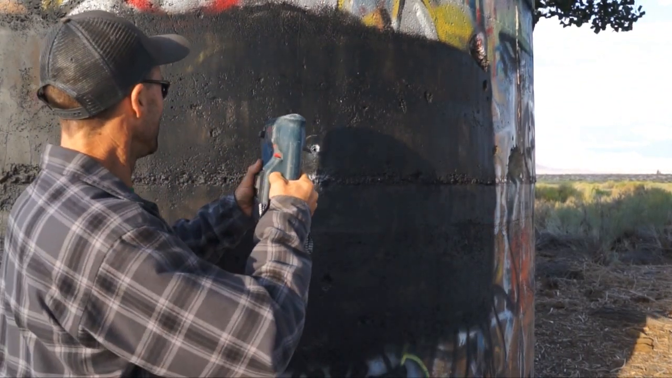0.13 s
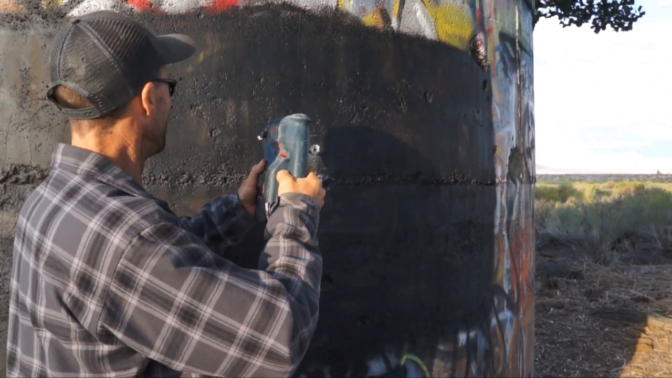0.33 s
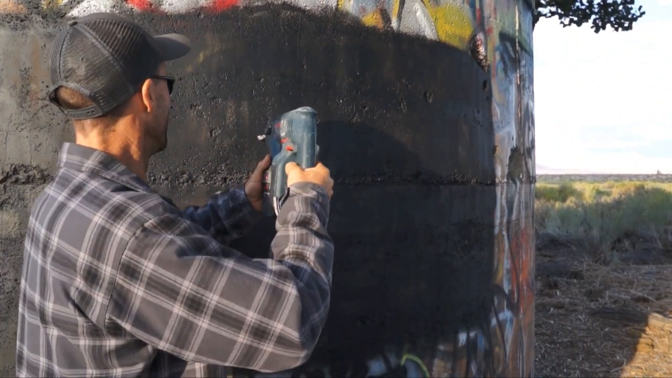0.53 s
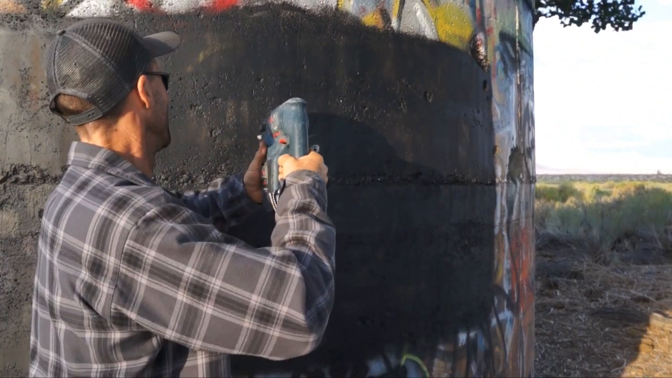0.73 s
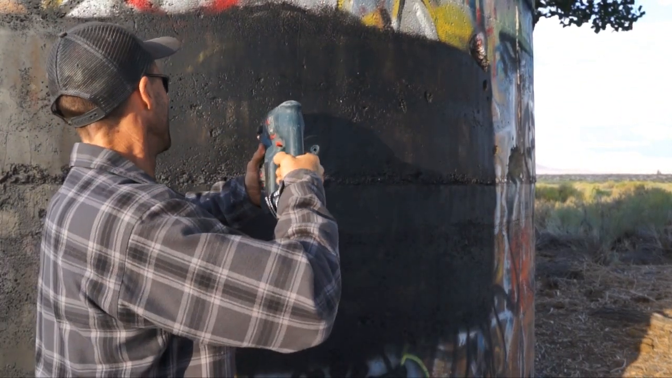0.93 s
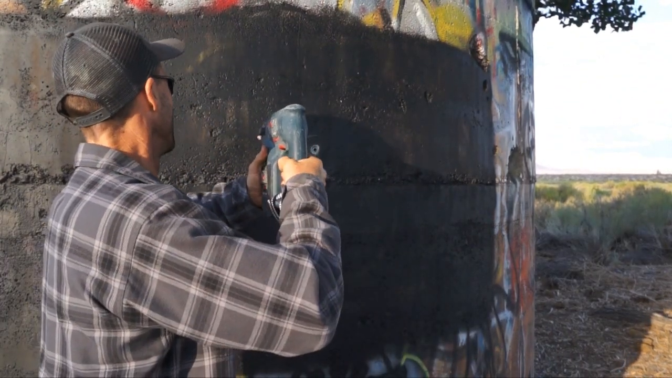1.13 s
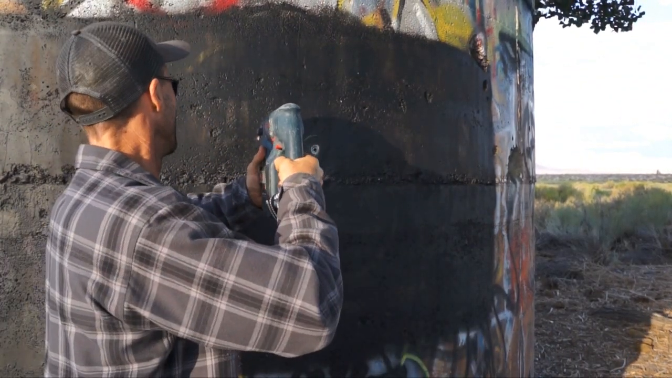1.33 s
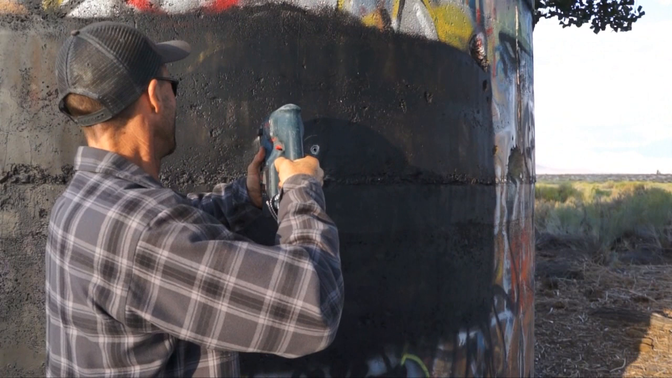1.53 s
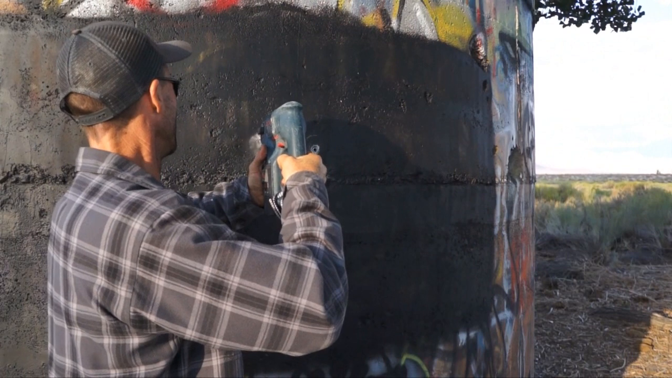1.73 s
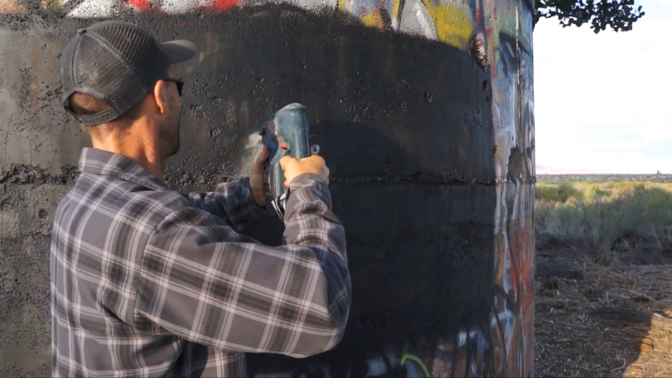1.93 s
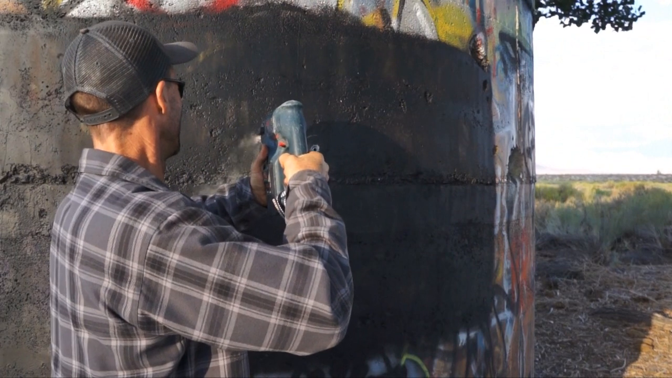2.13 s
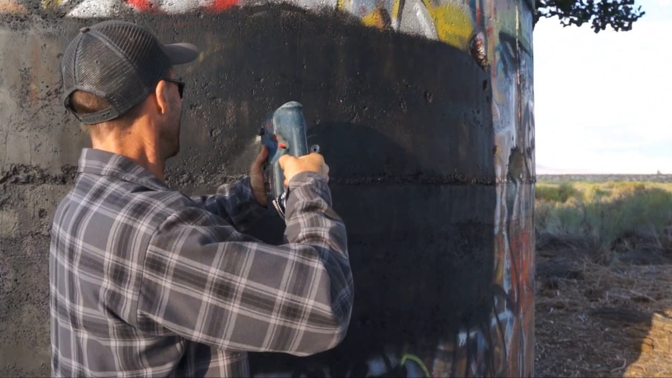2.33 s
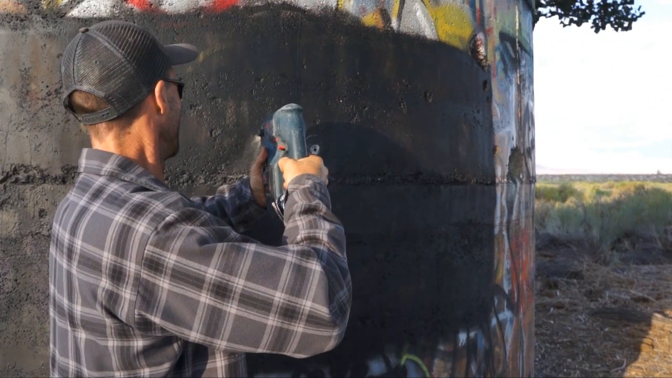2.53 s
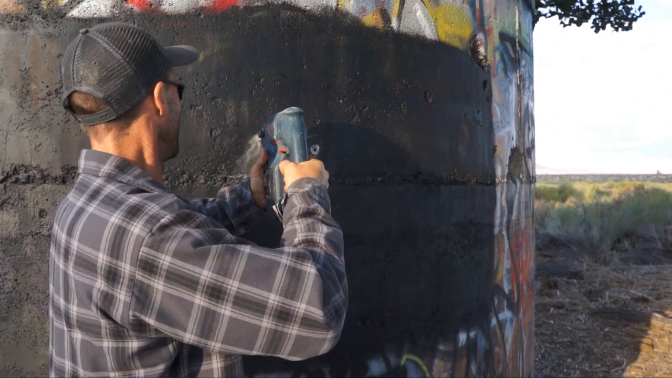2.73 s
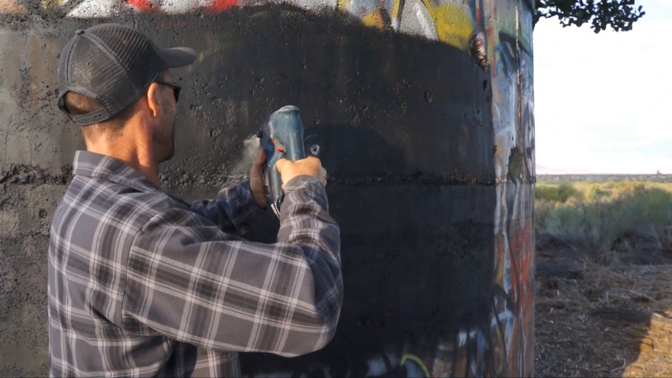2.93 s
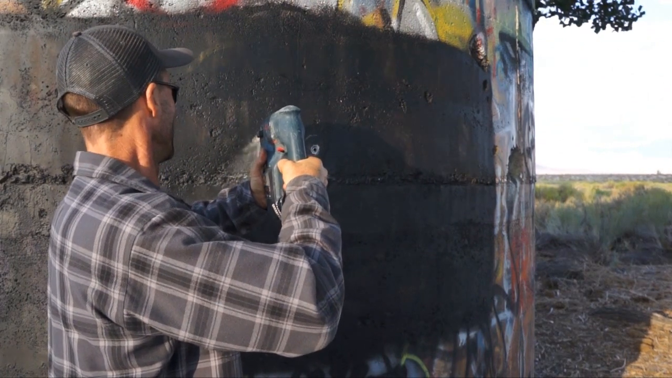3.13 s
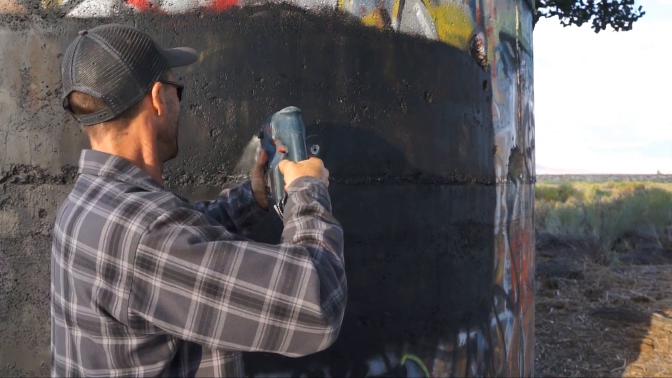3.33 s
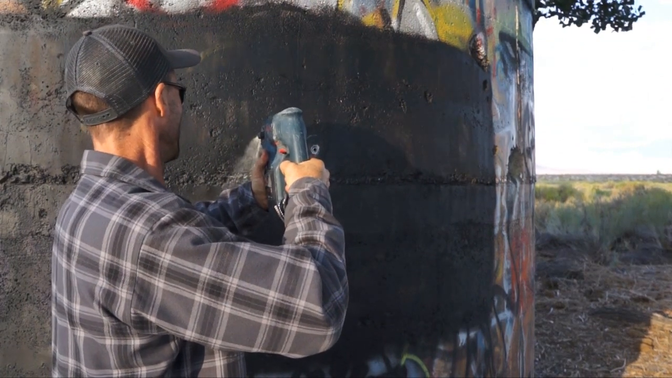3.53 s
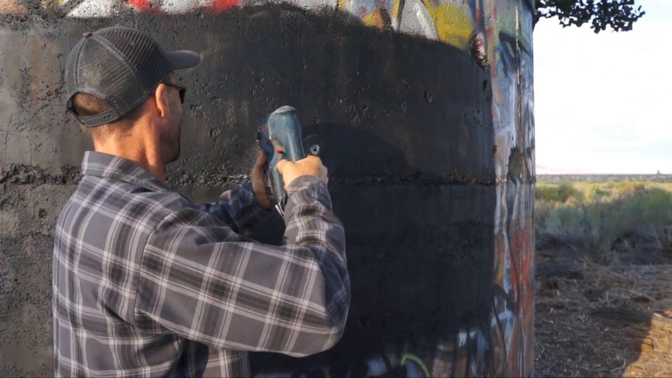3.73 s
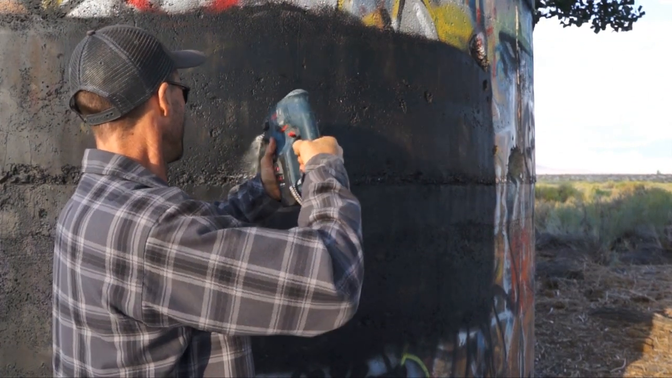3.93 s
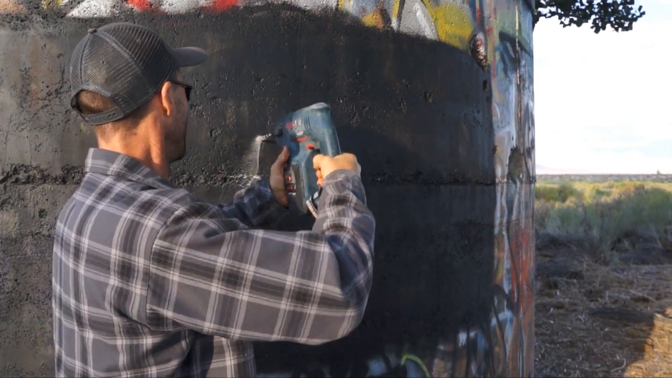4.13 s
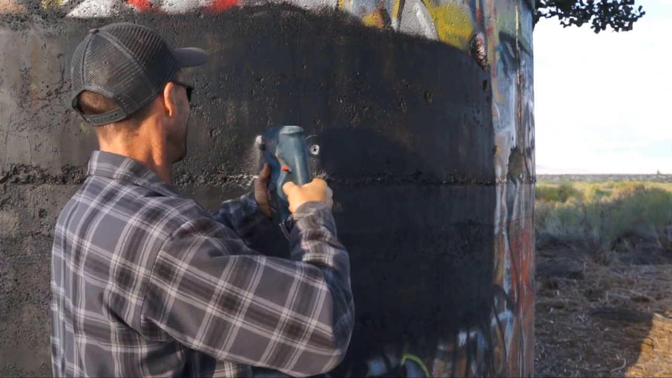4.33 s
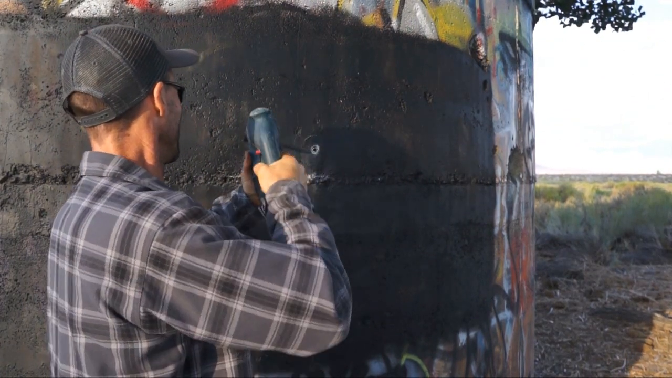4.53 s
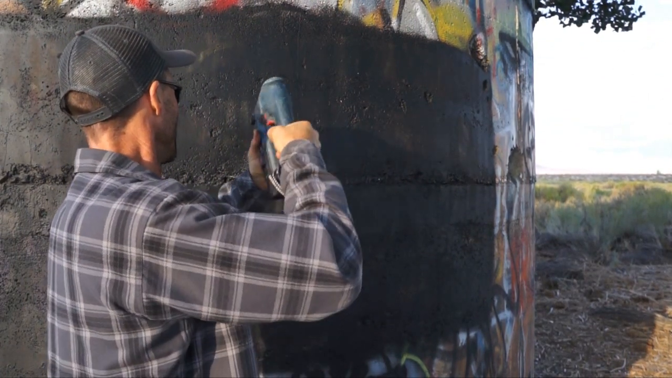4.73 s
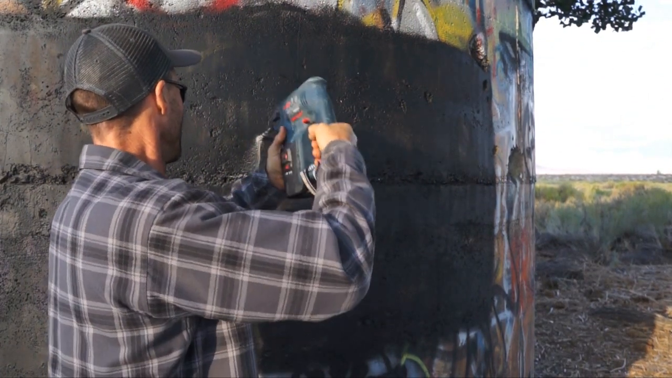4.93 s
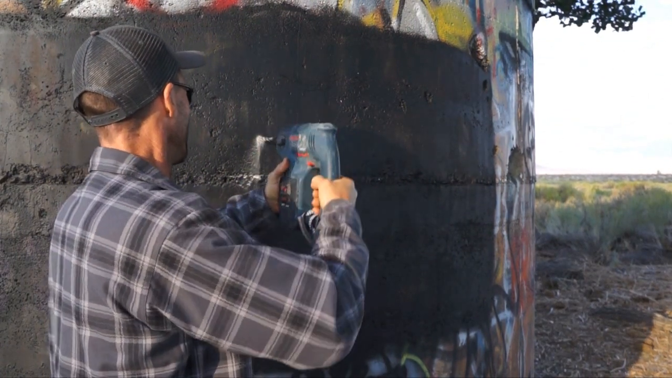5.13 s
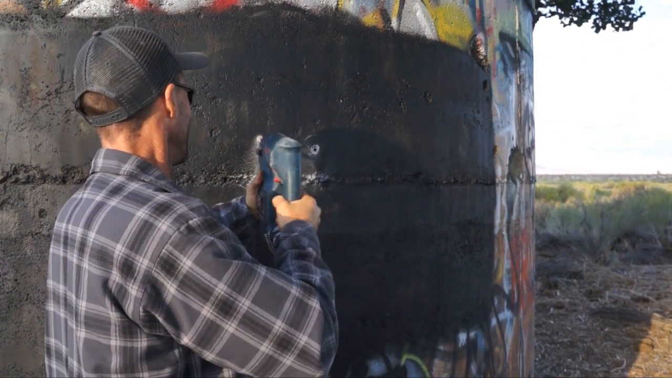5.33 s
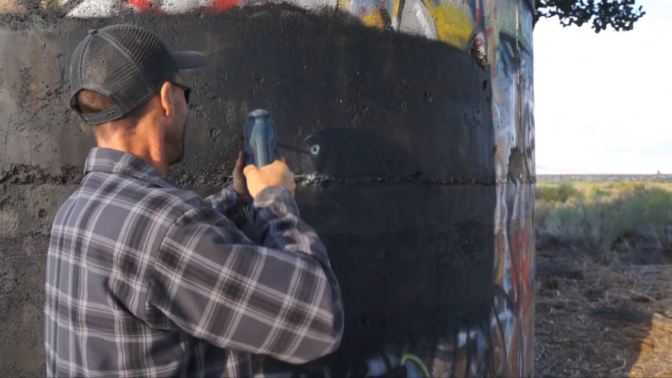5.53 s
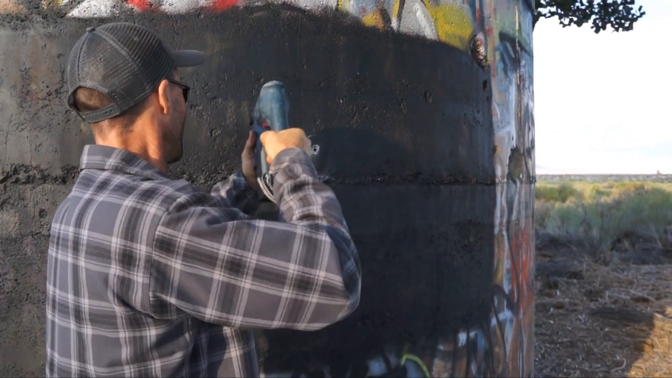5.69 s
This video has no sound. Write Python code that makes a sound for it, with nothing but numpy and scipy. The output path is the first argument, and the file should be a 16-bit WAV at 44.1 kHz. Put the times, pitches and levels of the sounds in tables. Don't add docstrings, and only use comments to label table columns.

```python
import sys
import numpy as np
from scipy import signal
from scipy.fft import rfft, irfft, next_fast_len
from scipy.io import wavfile
from scipy.ndimage import uniform_filter1d

SR = 44100
rng = np.random.default_rng(int(sys.argv[2]) if len(sys.argv) > 2 else 0)


def waveform_to_disk(signal):
    frames = np.transpose(np.atleast_2d(signal))
    scaled = np.clip(frames, -1, 1) * 32767
    samples = np.round(scaled).astype(np.int16)
    wavfile.write(sys.argv[1], SR, samples)


def makeup_ratio(level_db):
    decades = np.asarray(level_db, float) / 20
    return 10 ** decades


N = 254016
T = np.arange(N) / SR
SIZE = next_fast_len(N + 8192)
HZ = np.fft.rfftfreq(SIZE, 1 / SR) + 1e-3
BORING_ENDS_S = 3.95


def level(x):
    return x / np.sqrt(np.mean(x ** 2))


def curve(rows, off=-100):
    s, *columns = np.transpose(rows)
    return [np.interp(T, s, c, left=off, right=c[-1]) for c in columns]


def across(rows):
    hz, value = np.transpose(rows)
    return np.interp(np.log(HZ), np.log(hz), value)


def colour(x, rows):
    return level(irfft(rfft(x, SIZE) * makeup_ratio(across(rows)), SIZE)[:N])


def ring(x, modes):
    out = np.zeros(N)
    for k, (hz, width, db) in enumerate(modes):
        out += (-1) ** k * makeup_ratio(db) * signal.lfilter(*signal.iirpeak(hz, hz / width, SR), x)
    return level(out)


def fade(x, tau_s):
    return signal.lfilter([1], [1, -np.exp(-1 / (tau_s * SR))], x)


def noise():
    return rng.standard_normal(N)


def clicks(at_s, size):
    return np.bincount(np.clip((at_s * SR).astype(int), 0, N - 1), size, N)


def flat(x, span_s):
    return x / np.sqrt(uniform_filter1d(x ** 2, int(span_s * SR)) + 1e-3)


def bumps(at_s, half_s, size):
    return sum(g * np.exp(-.5 * ((T - s) / h) ** 2) for s, h, g in zip(at_s, half_s, size))


# frequency in Hz, density in dB per Hz.
AIR = [(18, -44), (30, -20), (61, -7), (88, -35), (225, 9.5), (264, -21), (317, -10), (343, -2), (579, 3),
       (733, -16), (1370, -3.5), (12700, -22), (15700, -48)]


def outdoor_air():
    shared, left, right = [colour(noise(), AIR) for _ in range(3)]
    return makeup_ratio(-68) * np.array([shared + .5 * left, shared + .5 * right])


def whistle():
    return np.sin(2 * np.pi * 12950 * T + np.cumsum(noise()) * .03) * makeup_ratio(-82)


def between_moves(db):
    return makeup_ratio(db - 23 * (T > BURSTS[0][1]))


# centre in seconds, half length in seconds, level in dB.
GUSTS = [(0, .04, -65), (0.073, 0.0084, -38.5), (.12, .03, -61), (0.403, .045, -58.5), (.8, 0.083, -72),
         (0.953, .04, -64)]


def wind():
    s, half_s, db = np.transpose(GUSTS)
    rumble = colour(noise(), [(15, -2), (50, -6.0), (120, -4.0), (250, -21), (600, -71)])
    return rumble * (between_moves(-73) + bumps(s, half_s, makeup_ratio(db)))


# centre in seconds, half length in seconds, grit in dB, steel in dB.
DRAGS = [(0, 0.017, -67, -80), (.07, 0.013, -71, -84), (0.34, 0.031, -55, -82), (0.762, 0.023, -67, -53.5),
         (.9, 0.054, -67.5, -65.5), (0.991, 0.029, -51, -70), (1.19, 0.063, -64.5, -79)]


def scrapes():
    s, half_s, grit_db, steel_db = np.transpose(DRAGS)
    catches = (rng.random(N) < 250 / SR) * makeup_ratio(2.2 * rng.exponential(size=N))
    grains = fade(catches, .002) + .8
    grit = ring(grains * noise(), [(248, 190, 5.5), (620, 170, 12.5), (1170, 390, 9.0), (2220, 2200, -2)])
    steel = ring(noise(), [(9200, 2200, -1.5), (4450, 9300, -9.5)])
    grit = grit * (between_moves(-65.5) + bumps(s, half_s, makeup_ratio(grit_db)))
    return grit + steel * (between_moves(-73.5) + bumps(s, half_s, makeup_ratio(steel_db)))


def strikes(at_s, db, tick_db, t60_s, dull_hz, tick_share):
    age = np.arange(int(.12 * SR)) / SR
    low = signal.butter(2, [400, dull_hz], "bandpass", fs=SR)
    high = signal.butter(3, [2200, 10500], "bandpass", fs=SR)
    out = np.zeros(N + len(age))
    for s, d, tk, t60 in zip(at_s, db, tick_db, t60_s):
        burst = rng.standard_normal(len(age))
        knock = 2.47 * signal.lfilter(*low, burst * makeup_ratio(-60 * age / (0.68 * t60)))
        knock += 1.18 * signal.lfilter(*signal.iirpeak(1150, 6.0, SR), knock)
        walls = [signal.lfilter(*signal.iirpeak(hz, 45, SR), knock) for hz in (2200, 2950)]
        knock += 0.87 * sum(walls)
        tick = makeup_ratio(tk) * signal.lfilter(*high, burst * makeup_ratio(-60 * age / (tick_share * t60)))
        start = int(s * SR)
        out[start:start + len(age)] += makeup_ratio(d) * (knock + tick)
    return out[:N]


# start in seconds, peak in dB, steel tick minus knock in dB, t60 in seconds.
TAPS = [(0.183, -41, -6, 0.05), (0.298, -30.5, -18, 0.045), (0.318, -22, 3, 0.082),
        (0.626, -44.5, 10, 0.055), (0.7, -31.5, 6, 0.045), (0.839, -46, -6, 0.05),
        (0.927, -27.5, 11.5, 0.063), (0.955, -26, -6, 0.035), (0.97, -23, 0, 0.033),
        (0.987, -24, -2, 0.025), (1.005, -38, -6, 0.05), (1.112, -24.5, 2.5, 0.033),
        (1.119, -45, 10, 0.041), (1.19, -44, -6, 0.05), (1.238, -27.5, 10, 0.26), (1.265, -15.5, -18, 0.11),
        (3.769, -24.5, 19, 0.04), (3.794, -23, -1, 0.045)]


def taps():
    s, db, tick_db, t60_s = np.transpose(TAPS)
    return strikes(s, db - 11.0, tick_db, t60_s, dull_hz=2160, tick_share=0.12)


# time in seconds, blows per second.
SPEED = [(1.24, 45), (1.35, 66), (1.6, 67), (1.95, 74), (2.1, 77), (2.8, 77.3), (3.5, 74.6), (3.74, 70),
         (3.82, 61), (3.93, 69), (4.04, 72.6), (4.14, 75.6), (4.22, 76.5), (4.65, 74.9), (5.04, 75.4),
         (5.2, 76), (5.76, 76.2)]


def motor_turns():
    return np.cumsum(curve(SPEED, off=40)[0]) / SR


# pulled in seconds, full power in seconds, let go in seconds.
BURSTS = [
    (1.255, 1.306, 3.5595),
    (3.745, 3.831, 6),
]


def power_db():
    pulls = []
    for on, full, off in BURSTS:
        to_go = np.clip((full - T) / (full - on), 0, 1)
        rise = np.where(T < on, -100, -45.5 * to_go ** 1.9)
        pulls.append(rise - 290 * np.maximum(T - off, 0))
    return np.max(pulls, axis=0)


# time in seconds, push from 0 to 1.
PUSH = [(1.24, 0.35), (1.62, 0.45), (1.72, 0.65), (1.85, 0.83), (1.995, 1), (2.015, 0.04), (2.4, 0.29),
        (2.66, 0.45), (2.73, 0.77), (3.1, 0.67), (3.56, .9), (3.64, 0.7), (3.82, 0.75), (3.93, 0.74),
        (3.97, 0.13), (4.5, 0.38), (5.76, .25)]


def pressure():
    push = np.clip(curve(PUSH, off=0)[0], 0, 1)
    return push, np.clip(1.23 * push, 0, 0.57)


# start in seconds, peak in dB, steel tick minus knock in dB.
SLIPS = [(1.304, -19, -5), (1.327, -14, 1), (1.358, -10, -4), (1.380, -9, -8), (1.401, -12, -3),
         (1.423, -19, -1), (1.447, -12, -6), (1.498, -11, -4), (1.526, -8, -18), (1.555, -19, -8),
         (1.585, -7, -7), (1.615, -13, -10), (1.643, -16, -17), (2.031, -5.5, -27), (2.057, -1.5, -8),
         (2.082, -12, -6), (2.163, -6, -6), (2.188, -12, -6), (2.262, -10, -12), (2.314, -6, -15),
         (2.405, -16, -5), (2.477, -9.5, -14), (2.554, -15.5, 2), (2.571, -5.5, -2), (2.599, -25, -10),
         (2.615, -12, -8), (2.952, -17, -4), (3.62, -16, 2), (3.995, -15.5, 5)]
# start in seconds, peak in dB, steel tick minus knock in dB.
STRIKES = [(4.022, -10.5, -0.5), (4.222, -8.5, 2), (4.326, -11, -18), (4.353, -10, -1.5), (4.389, -13, 2),
           (4.408, -12.5, 1), (4.431, -4, -12), (4.506, -13.5, 3), (4.535, -11, 0), (4.562, -7, -9),
           (4.865, -12, -2), (4.918, -6, 1), (4.95, -11.5, 0), (4.979, -10, -14), (5.032, -13.5, 4),
           (5.066, -9, 0), (5.09, -14, 10.5), (5.152, -5.5, -2), (5.185, -9, -4), (5.212, -5.5, -2.5),
           (5.233, -5.5, -7), (5.261, -11, -1), (5.313, -9.5, -16), (5.34, -4.5, -2), (5.37, -7.5, -4),
           (5.456, -7, -4), (5.505, -1, -12), (5.589, -4, -6), (5.616, -9, .1), (5.731, -15, -4)]


def impacts(at, firm):
    chance = rng.standard_normal((len(at), 4)).T
    blow = clicks(at / SR + .0002 * chance[0], makeup_ratio(1.8 * chance[1]))
    rebound = clicks(at / SR + .0055 + .0006 * chance[2], makeup_ratio(-2.5 + 3.0 * chance[3]))
    chatter_db = -10 + 2.5 * np.minimum(rng.exponential(size=N), 3)
    chatter = (rng.random(N) < 160 / SR) * makeup_ratio(chatter_db)
    even = firm * (blow + rebound) + (1 - firm) * chatter
    second = at[::2]
    light = rng.standard_normal((len(second), 3)).T
    rattle_db = -16 + 4.5 * np.tanh(light[1]) - 40 * seating(firm[second])
    rattle = np.transpose([second / SR + 0.004 * light[0], rattle_db, 4 * light[2] - 1.5])
    s, db, tick_db = np.vstack([SLIPS, STRIKES, rattle]).T
    knocks = even + clicks(s, makeup_ratio(db + 18))
    ticks = even + clicks(s, makeup_ratio(db + tick_db + 14.5))
    ticks += clicks(s + .0055, makeup_ratio(db + tick_db - 0.5))
    return blow, knocks, ticks


def cracks():
    s, db, tick_db = np.vstack([SLIPS, STRIKES]).T
    return strikes(s, db - 17, tick_db + 9, np.full(len(s), 0.025), dull_hz=3000, tick_share=0.47)


def seating(firm):
    return np.clip(3 * firm - 1.2, 0, 1)


# frequency in Hz, density in dB per Hz.
STEEL = [(3240, -47), (5500, -19), (5930, -17.5), (7570, -6.5), (8200, -15.5), (9030, 3.5), (9730, -7.5),
         (10100, 8.5), (10500, 4), (10900, -4), (12700, -7.5), (14100, -14), (15000, -22)]
# frequency in Hz, density in dB per Hz.
STEEL_LOOSE = [(3240, -31.5), (5500, -4), (5900, -12), (7080, -2), (7930, -13.5), (9360, 4), (11600, -6),
               (14700, -24.5), (15600, -44)]


def bit_steel(ticks, firm):
    swell = fade(fade(ticks, 0.0006), 0.001) / 15
    strain = (swell + 0.47 * (1 - 1.45 * firm)) * noise()
    seated = seating(firm)
    return seated * colour(strain, STEEL) + (1 - seated) * colour(strain, STEEL_LOOSE)


# frequency in Hz, width in Hz, level in dB.
CASING = [(2230, 120, 0.5), (2576, 137, 1), (4510, 250, -4)]


def tool_casing(blow, knocks, firm):
    buzz = (fade(.3 * knocks, .0012) + .12 - .08 * firm) * noise()
    return ring(ring(10.5 * firm * blow + buzz, CASING), [(2500, 900, 0), (4400, 600, -3)])


# frequency in Hz, density in dB per Hz.
GRIND = [(53, -59), (90, -31.5), (265, -13.5), (315, -18.5), (461, -8), (952, -2), (1040, -1.5), (1320, -4),
         (1490, -2.5), (2100, -11.5), (2730, -9), (4620, -120)]
# frequency in Hz, width in Hz, level in dB.
CHUCK = [(270.5, 12, -11), (1099, 48, 1), (1501, 15.4, 7)]


def stone_grit(blow, knocks, firm):
    grind = (fade(knocks, 0.0051) + 0.76) * noise()
    crush = 4.96 * firm * fade(blow, 0.00026)
    return colour(grind + crush, GRIND) + makeup_ratio(-8.5) * ring(grind + 1.3 * noise(), CHUCK)


# frequency in Hz, density in dB per Hz.
ROAR = [(880, -44), (1500, -4), (2400, -0.5), (2600, -0.5), (4640, -5), (5220, -2.5), (6110, -4.5),
        (8880, 3), (12900, -62), (14400, -26), (15700, -79)]


def motor_roar(ticks):
    return colour((fade(ticks, 0.0032) + .5) * noise(), ROAR)


# frequency in Hz, width in Hz, level in dB.
THUD = [(153.6, 46, 1.5), (232.5, 68, 6), (278, 109, 4.5), (454, 220, -7), (530, 120, -9.5)]


def wall_thud(at, thud_db):
    thud = ring(ring(clicks(at / SR, np.ones(len(at))), THUD), [(417, 860, 0)])
    lingers_s = .07
    thud = thud * fade(makeup_ratio(thud_db), lingers_s) / (lingers_s * SR)
    sway = level(uniform_filter1d(uniform_filter1d(noise(), 4000), 4000))
    return thud * makeup_ratio(1.8 * np.tanh(sway))


def shank_ring(blow, shank_db):
    shank = ring(ring(fade(blow, .004) * noise(), [(15270, 150, 0)]), [(15270, 250, 0)])
    return shank * makeup_ratio(shank_db + 7 * (T < 2.0))


# centre in seconds, half length in seconds, steel in dB, stone in dB.
JABS = [(1.44, .05, -1.5, 3), (1.748, .04, 1.5, 1.2), (2.14, 0.027, 1, 1.3), (2.28, .04, 1, 1),
        (2.387, 0.035, 3.5, 1.7), (2.54, 0.019, 0, -0.5), (3.973, 0.03, -6, -3), (4.01, 0.022, 4.5, 0.5),
        (4.12, 0.065, -3.5, -5), (4.386, 0.064, 2.5, 3), (4.523, 0.083, -3.5, 0), (4.64, 0.041, 2.5, 4.5),
        (4.79, 0.077, -0.5, 5), (5.003, 0.089, 1.5, 1.3), (5.117, 0.037, 0.5, -0.2),
        (5.24, 0.045, 3.5, 3.5), (5.45, 0.071, -1, 2.5), (5.59, 0.045, 2.5, 3.5), (5.76, .04, 1.5, 4)]


def jabs():
    s, half_s, steel_db, stone_db = np.transpose(JABS)
    return bumps(s, half_s, steel_db), bumps(s, half_s, stone_db)


# start in seconds, end in seconds, whine in dB, its octave in dB.
WHINES = [(2.08, 2.9, -41.5, -48), (2.9, 3.56, -57, -56), (4.0, 4.112, -38.5, -37),
          (4.095, 4.23, -43, -38.5), (4.6, 4.939, -38, -41.5), (4.96, 5.145, -35, -33.5),
          (5.2, 5.8, -42.5, -74)]


def gears(turns, power):
    wobble = np.cumsum(uniform_filter1d(noise(), 300)) * .012
    mesh = 2 * np.pi * 35 * turns + wobble
    gains = makeup_ratio(-79 + power)
    gains = gains + sum(np.outer(makeup_ratio(db), (T > start) & (T < end)) for start, end, *db in WHINES)
    whine, octave = uniform_filter1d(gains, int(0.07 * SR))
    upper = np.sin(2 * mesh) + .5 * np.sin(8 / 3 * mesh + 2.3 * wobble)
    return np.sqrt(2) * (np.sin(mesh) * whine + upper * octave)


def hammer():
    turns, power = motor_turns(), power_db()
    push, firm = pressure()
    at = np.flatnonzero(np.diff(np.floor(turns)))
    blow, knocks, ticks = impacts(at, firm)
    on_steel, on_stone = jabs()

    def law(unpushed_db, push_db, clearing_db, power_share):
        return unpushed_db + push_db * push + clearing_db * (T > BORING_ENDS_S) + power_share * power

    steel_db = law(-28, 7.5, -1.5, 0.9) + on_steel
    casing_db = law(-38, 12, -5.5, 1.2) + 0.94 * on_stone
    grit_db = law(-29.5, -2, -4.5, 0.66) + on_stone
    roar_db = law(-25.5, 0.6, -1.7, 0.75) + 0.31 * (on_steel + on_stone)
    layers = ((bit_steel(ticks, firm), steel_db), (tool_casing(blow, knocks, firm), casing_db),
              (stone_grit(blow, knocks, firm), grit_db), (motor_roar(ticks), roar_db))
    out = sum(flat(x, 0.083) * makeup_ratio(db) for x, db in layers)
    out += wall_thud(at, law(-67, 20, -4, 1))
    out += shank_ring(blow, law(-59, 19, -19, 2))
    return out + gears(turns, power)


# frequency in Hz, left minus right in dB.
LEAN = [(60, 1), (110, 2.5), (200, 0.5), (380, 1.5), (700, 1), (1290, 5), (2380, 1.5), (4400, 4),
        (8120, 8.5), (15000, -1)]
# frequency in Hz, scattered share from 0 to 1.
DIFFUSE = [(100, 0.07), (600, 0.14), (1000, 0.17), (2000, 0.26), (4000, 0.34), (8000, 0.45), (11000, 0.25),
           (14000, 0.43)]


def two_ports(x):
    age = np.arange(6000) / SR
    scatter = rng.standard_normal(len(age)) * np.exp(-age / .02)
    scatter /= np.sqrt(np.sum(scatter ** 2))
    share = np.clip(across(DIFFUSE), 0, .9)
    other = np.outer([1, -1], share * rfft(scatter, SIZE))
    late_s = [0, 8e-6]
    lean = makeup_ratio(np.outer([.5, -.5], across(LEAN))) * np.exp(-2j * np.pi * np.outer(late_s, HZ))
    return irfft(rfft(x, SIZE) * (np.sqrt(1 - share ** 2) + other) * lean, SIZE)[:, :N]


def scene():
    x = wind() + scrapes() + taps() + hammer() + cracks()
    return two_ports(x) + outdoor_air() + whistle()


def band_limit(x):
    return signal.sosfilt(signal.butter(12, 15850, fs=SR, output="sos"), x)


def record(dry):
    dry = signal.sosfilt(signal.butter(2, 40, "highpass", fs=SR, output="sos"), dry)
    rounded = np.tanh(dry / .9) * .9
    return band_limit(rounded)


dry = scene()
out = record(dry)
waveform_to_disk(out)
```